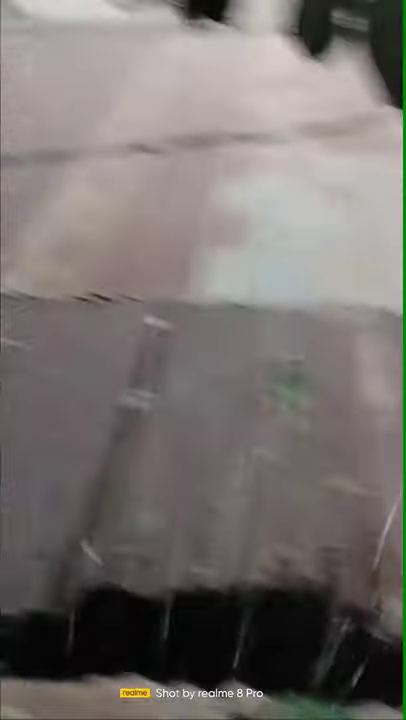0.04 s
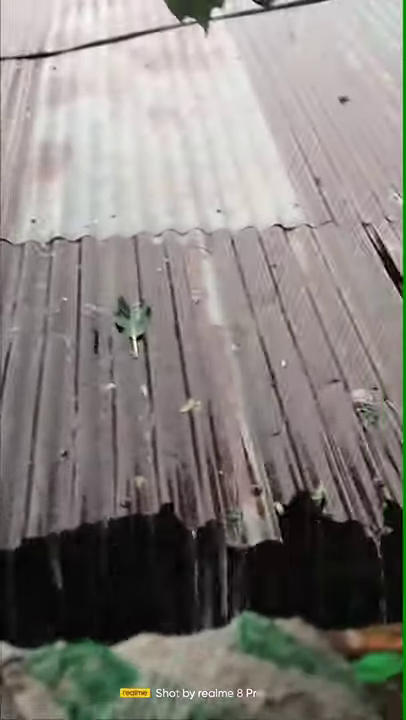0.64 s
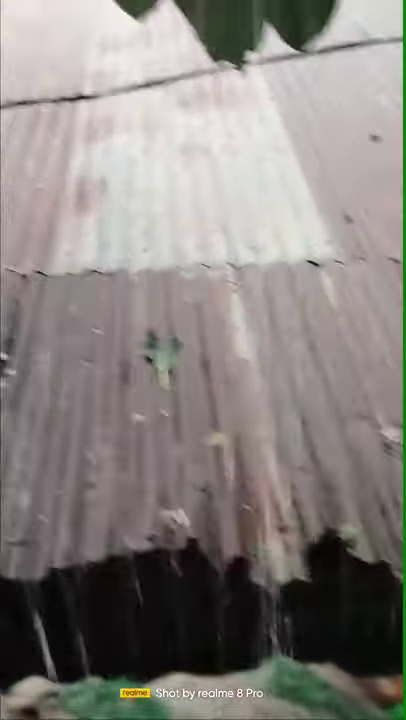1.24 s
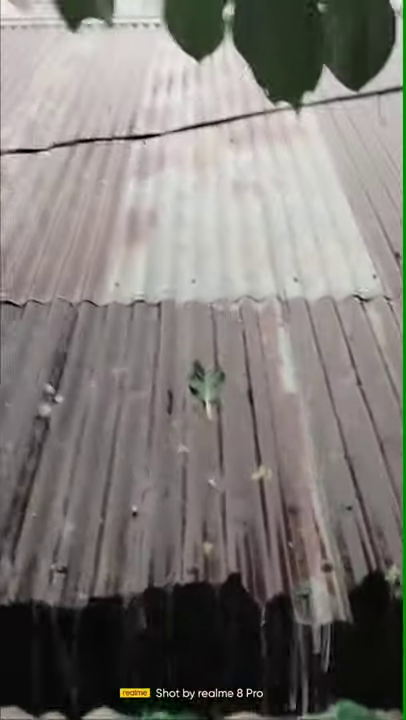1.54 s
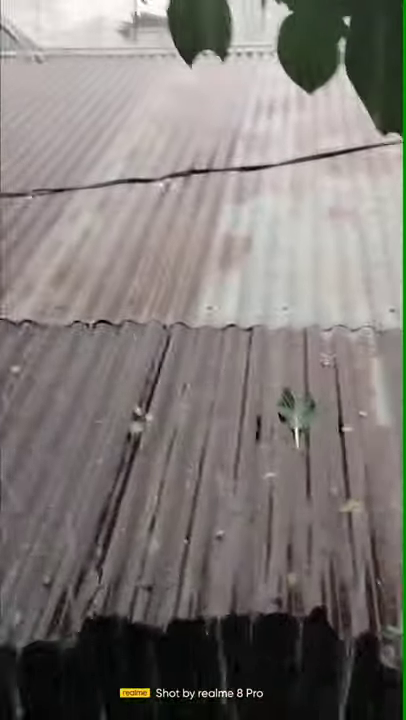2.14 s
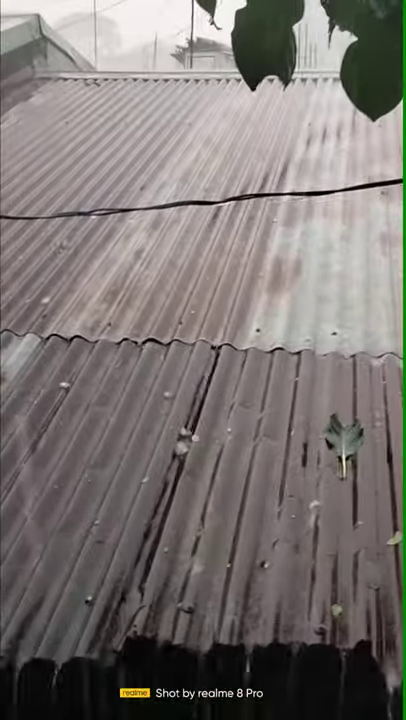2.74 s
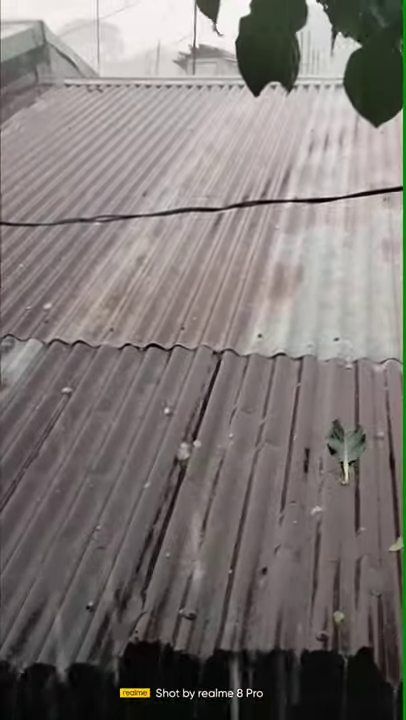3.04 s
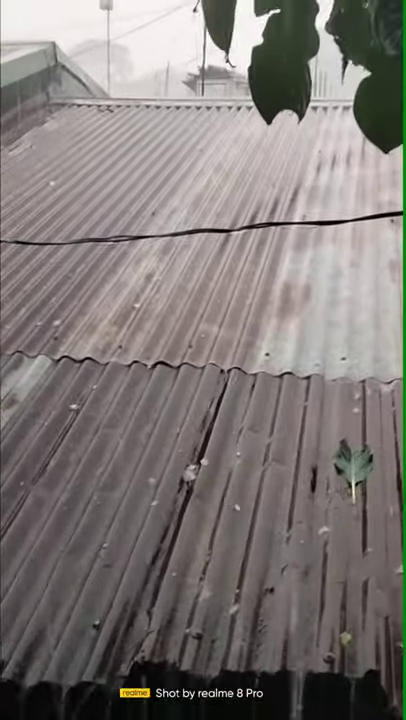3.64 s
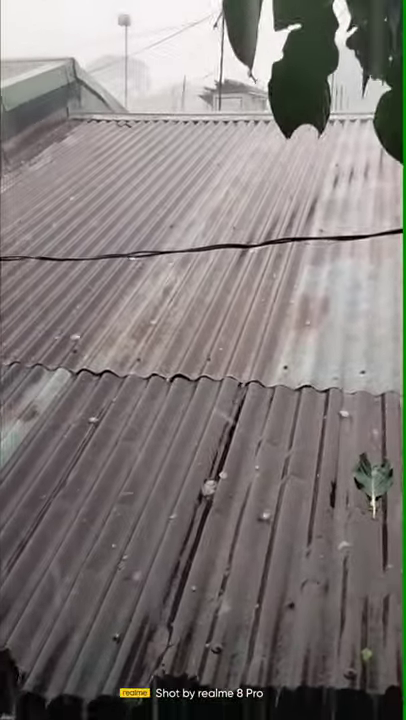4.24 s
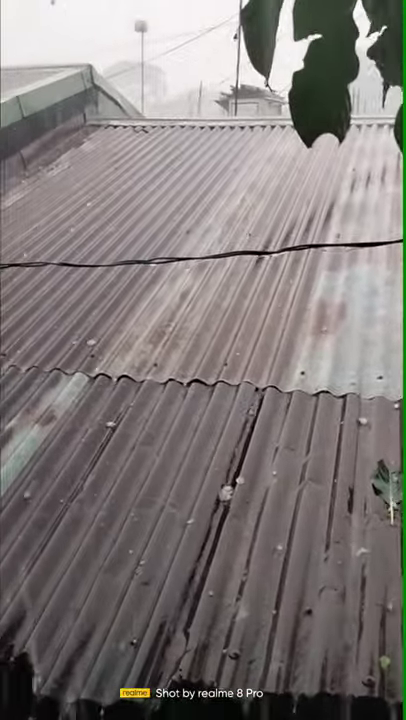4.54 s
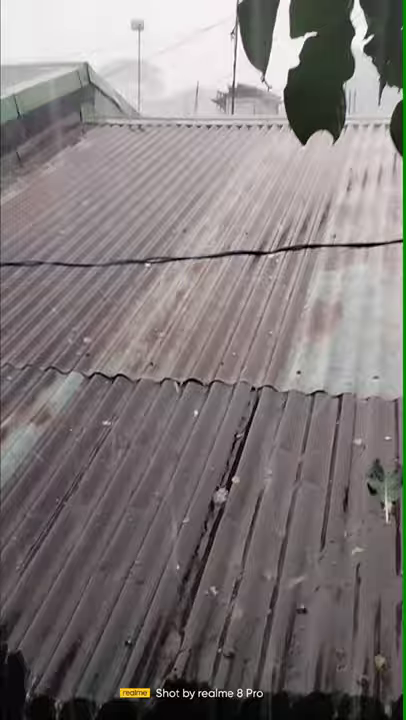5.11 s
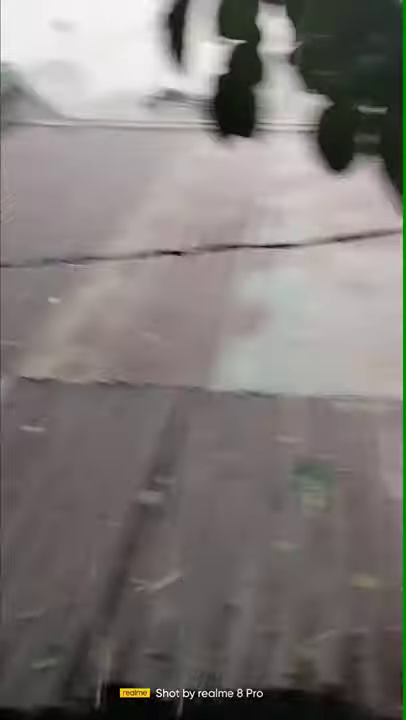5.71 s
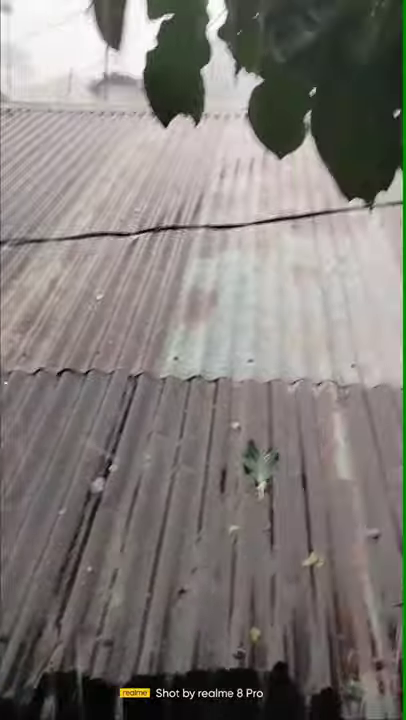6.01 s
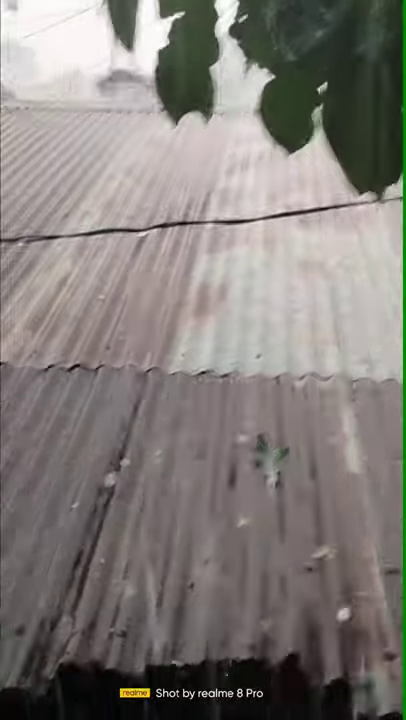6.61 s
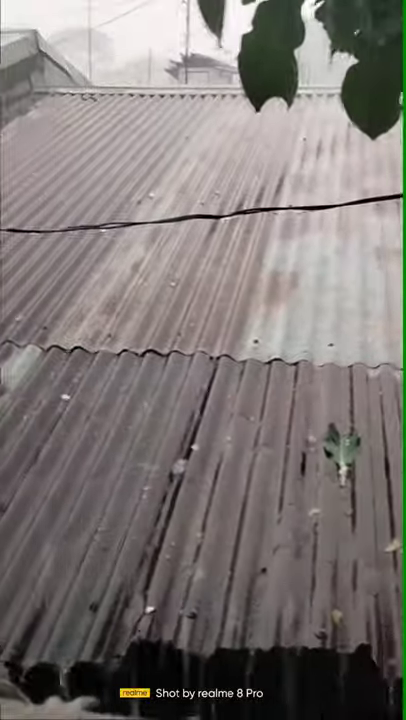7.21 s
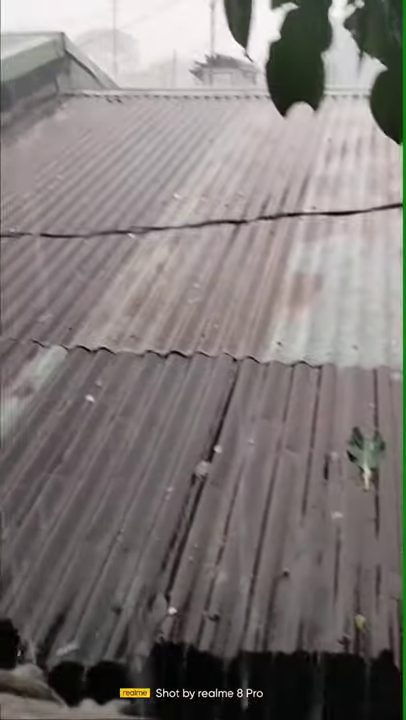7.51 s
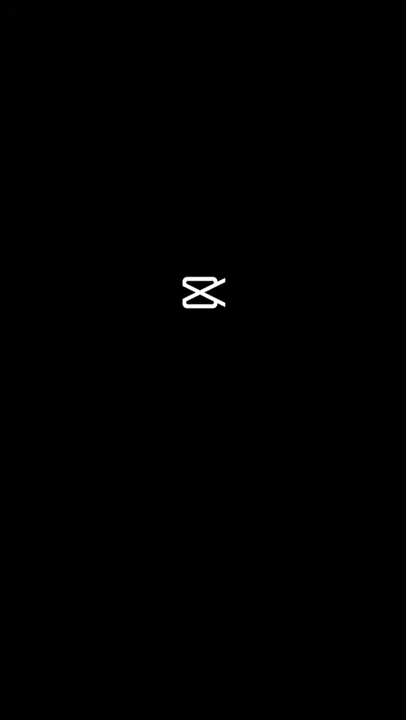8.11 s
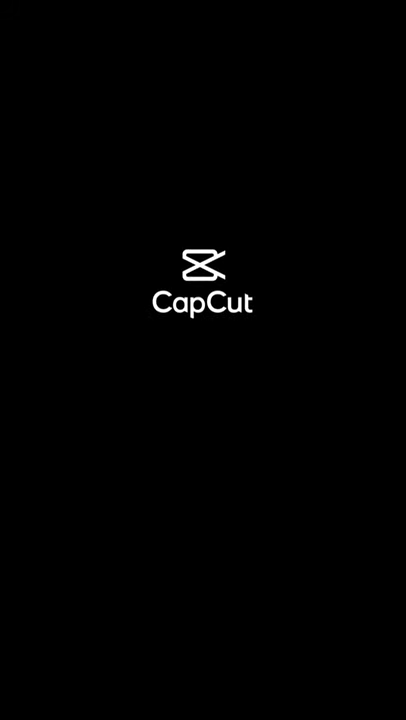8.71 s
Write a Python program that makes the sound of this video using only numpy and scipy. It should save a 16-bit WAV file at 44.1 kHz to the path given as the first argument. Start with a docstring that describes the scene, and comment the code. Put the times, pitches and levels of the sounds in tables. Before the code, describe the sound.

Hailstones hammer and shatter on sheet metal roofing overhead, clanging and thudding through a steady patter of rain.

```python
"""Hail and rain pound corrugated metal roofs, heard from close under the eaves.
From the first instant rain and small stones patter, while larger impacts excite the modes of the metal:
panels thud, ridges knock, sheets further up clang, and near stones shatter with a bright crash.
Near 0.6 and 2.8 s the sound ducks after a loud knock; the lesser clangs swell around 4.7 s.
The heaviest thud and the hardest near crash land at about 6.3 s, and all cuts off just before 8 s."""
import sys
import numpy as np
from scipy import signal
from scipy.fft import rfft, irfft, next_fast_len
from scipy.io import wavfile
from scipy.ndimage import uniform_filter1d, minimum_filter1d, map_coordinates

SR = 44100
rng = np.random.default_rng(int(sys.argv[2]) if len(sys.argv) > 2 else 0)


def waveform_to_disk(signal):
    """Save audio, clipped to [-1, 1], as 16-bit WAV at the path in sys.argv[1]."""
    frames = np.transpose(np.atleast_2d(signal))
    scaled = np.clip(frames, -1, 1) * 32767
    samples = np.round(scaled).astype(np.int16)
    wavfile.write(sys.argv[1], SR, samples)


N = 386316
END_S = 7.956

# A crack or tick as heard through the microphone, which rings near 8 and 15 kHz: f/Hz, relative level/dB
HEARD_CRACK = [(2500, -23.5), (5000, -10.5), (8200, 2.5), (10500, -2.5), (13000, -4), (15200, 1.5)]


def amp(db):
    """Amplitude ratio for a level in decibels."""
    return 10 ** (np.asarray(db) / 20)


def along(points, hz):
    """Spectral envelope: (f/Hz, level/dB) points interpolated on a logarithmic frequency axis."""
    f, db = np.transpose(points)
    return np.interp(np.log(hz + 1), np.log(f + 1), db)


def hump(centre_hz, octaves, hz):
    """Selective excitation, in dB: the spot that is struck favours the modes around one frequency."""
    return -10 * np.log10(1 + (np.log2((hz + 1) / centre_hz[:, None]) / octaves) ** 2)


def ripple(count, hz, spacing_hz):
    """Irregular modal response, in dB: each of count spots has its own uneven comb of modes."""
    knots = rng.standard_normal((count, 400))
    position = np.minimum(hz / spacing_hz, 398)
    k = position.astype(int)
    return knots[:, k] + (position - k) * (knots[:, k + 1] - knots[:, k])


def wobble(rate):
    """Random modulation: a smooth curve through rate knots a second."""
    knots = rng.standard_normal(int(N * rate / SR) + 4)
    return map_coordinates(knots, [np.arange(N) * rate / SR])


def ticks(shape, rate, spread_db):
    """Shot noise: random impulses, rate a second, of log-normal size."""
    hit = rng.random(shape) < rate / SR
    return hit * rng.choice([-1, 1], shape) * amp(spread_db * rng.standard_normal(shape))


def coloured(x, body):
    """Minimum-phase filtering: each row of x takes the gain body(hz), in dB, and is scaled to rms 1."""
    n = x.shape[-1]
    size = 2 * next_fast_len(n // 2 + 1024)
    gain = amp(body(np.fft.rfftfreq(size, 1 / SR)))
    cepstrum = irfft(np.log(gain + 1e-6), size)
    cepstrum[..., 1:size // 2] *= 2  # folding the cepstrum makes the response causal
    cepstrum[..., size // 2 + 1:] = 0
    y = irfft(rfft(x, size) * np.exp(rfft(cepstrum)), size)[..., :n]
    return y / np.sqrt(np.mean(y ** 2, axis=-1, keepdims=True) + 1e-20)


def strikes(times, level_db, body, t60, attack, rate, spread_db):
    """Diffuse decay: each blow sends a dying crowd of reflections through the sheet."""
    t = np.arange(SR // 3) / SR
    reflections = coloured(ticks((len(times), len(t)), rate, spread_db), body)
    envelope = amp(-60 * t / np.reshape(t60, (-1, 1))) * (1 - np.exp(-t / attack))
    out = np.zeros(N + SR)
    for s, blow in zip(times, amp(level_db)[:, None] * reflections * envelope):
        out[max(round(s * SR), 0):][:len(t)] += blow
    return out[:N]


def ringing(times, hz, level_db, t60, attack):
    """Modal superposition: each blow starts a row of damped sinusoids in random phase."""
    t = np.arange(SR // 4) / SR
    out = np.zeros(N + SR)
    for s, f, db in zip(times, hz[:, :, None], level_db[:, :, None]):
        modes = amp(db - 60 * t / t60[:, None]) * np.sin(2 * np.pi * (f * t + rng.random(f.shape)))
        out[max(round(s * SR), 0):][:len(t)] += modes.sum(0) * (1 - np.exp(-t / attack))
    return out[:N]


def level_dips(t, stretch):
    """Amplitude modulation, in dB: set dips; near 0.6 and 2.8 s the sound ducks after a loud knock."""
    # Brief dips in level: t/s, relative level/dB, half-width before stretching/s
    dips = [(0.62, -3.5, 0.048), (0.783, -1.5, 0.045), (1.394, -1, 0.057), (2.84, -2, 0.023),
            (4.345, -2.5, 0.02), (5.326, -4.5, 0.018), (5.516, -3.5, 0.015), (6.255, -3, 0.014),
            (6.35, -3, 0.025), (6.945, -3, 0.024), (7.439, -0.5, 0.02)]
    return sum(db * np.exp(-((t - s) / (half * stretch)) ** 2) for s, db, half in dips)


def shower(count, db, range_db, far):
    """Jittered arrivals: times and levels of lesser stones, which follow the strength of the fall."""
    # Strength of the fall: t/s, relative level close by/dB, relative level further up/dB
    fall = [(0, 1.5, -4), (.5, 5, 3.5), (.75, 2, 3.5), (1.3, -0.5, 1), (1.8, 3.5, -2.5), (2.3, 0.5, 1),
            (2.8, 2, 1.5), (3.3, 0, 4.5), (3.8, -2, -0.5), (4.25, 2.5, -1), (4.7, 1.5, 8), (5.3, 1, -4.5),
            (5.7, 2.5, 1.5), (6.2, -1.5, 1), (6.6, 3.5, 1), (7.1, 1.5, -1.5), (7.6, 1, 0.5),
            (7.95, 1.5, 3.5)]
    at, near_db, far_db = np.transpose(fall)
    slip, size = rng.random((count, 2)).T - .5
    s = (np.arange(count) + .5 + 1.1 * slip) * END_S / count
    fall_db = np.interp(s, at, far_db if far else near_db)
    dip_db = 1.7 * level_dips(s + 0.019, stretch=1.5)  # these stones soften just ahead of each dip
    return s, db + range_db * size + fall_db + dip_db


def pitched_shower(count, db, range_db, far, low_hz, high_hz):
    """Pitch depends on the spot struck: lesser stones as rows of t/s, level/dB, f/Hz."""
    s, level_db = shower(count, db, range_db, far)
    hz = low_hz * (high_hz / low_hz) ** rng.random(count)
    return np.column_stack([s, level_db, hz])


def downpour():
    """Filtered shot noise: small stones patter on every roof around, and rain splashes on wet metal."""
    # Spectrum of small stones on the roofs: f/Hz, relative level/dB
    patter_spectrum = [(25, -48.5), (55, -31.5), (110, -10), (148, -7.5), (200, -16), (305, -5), (460, -9),
                       (620, -3.5), (1000, 0), (1550, -1.5), (2200, -6.5), (2900, -11.5), (4300, -16),
                       (6500, -35)]
    # Splash as heard through the microphone, which rings near 8 and 15 kHz: f/Hz, relative level/dB
    heard_splash = [(2500, -32), (4500, -6), (6200, -12), (7300, -5.5), (8150, 1.5), (9200, -6),
                    (10500, -14), (12000, -17.5), (15200, -8)]
    flurry_db = .5 * wobble(10)
    patter = coloured(ticks(N, rate=2200, spread_db=2.5), lambda hz: along(patter_spectrum, hz))
    splash = coloured(ticks(N, rate=6000, spread_db=2.0), lambda hz: along(heard_splash, hz))
    patter *= amp(-17.5 + flurry_db + 1.1 * wobble(40))
    splash *= amp(-27.0 + flurry_db + 0.87 * wobble(43))
    return patter + splash


def drops():
    """Brief impacts have broad spectra: close drops and ice chips tick on the wet edge of the roof."""
    when, size = rng.random((int(N / SR * 16), 2)).T
    return strikes(when * N / SR, -29 + 11 * size ** 2, lambda hz: along(HEARD_CRACK, hz),
                   t60=0.013, attack=.0002, rate=9000, spread_db=0.5)


def heavy_stones():
    """Flexural vibration: a whole panel booms in its low modes, a little differently at every spot."""
    # The heaviest stones: t/s, relative level/dB, centre of the boom f/Hz
    thuds = [(0.09, -24, 260), (0.156, -27, 240), (0.212, -24.5, 300), (0.262, -27, 130), (0.363, -23, 180),
             (0.816, -26, 150), (2.26, -25.5, 180), (2.756, -24, 258), (3.247, -25.5, 155),
             (3.523, -27.5, 280), (3.736, -21, 190), (3.889, -23.5, 239.4), (4.046, -30, 290),
             (4.496, -29, 170), (5.184, -26, 280), (5.454, -33, 110), (5.922, -26, 170),
             (6.275, -20.5, 180), (6.467, -26.5, 149.6), (6.513, -26.5, 230), (7.569, -25.5, 140),
             (7.884, -28.5, 290)]
    # Modes of a whole panel: f/Hz, relative level/dB, t60/s
    panel_modes = [(75, -20, .2), (110, -5, 0.22), (149.5, -2, 0.21), (211, -3.5, 0.098), (292, -1, .18),
                   (348.5, -4.5, 0.24), (393, -0.5, 0.26)]
    lesser = pitched_shower(count=32, db=-29.5, range_db=5, far=False, low_hz=215, high_hz=305)
    s, db, centre_hz = np.vstack([thuds, lesser]).T
    hz, mode_db, t60 = np.transpose(panel_modes)
    detune = 1 + 0.038 * rng.standard_normal((len(s), len(hz)))
    level_db = db[:, None] + mode_db + hump(centre_hz, 0.4, hz) + 5.5
    return ringing(s, hz * detune, level_db, t60, attack=0.0016)


def ridge_knocks():
    """Damped inharmonic modes: a stone on a corrugation gives a short hollow note."""
    # The clearest knocks: t/s, relative level/dB, pitch f/Hz
    notes = [(0.1, -10, 1020), (0.241, -11.5, 1020), (0.399, -9, 1020), (0.584, -5, 1044),
             (0.7, -11.5, 926), (0.717, -11, 1255), (0.954, -6, 845), (1.146, -10, 980), (1.348, -12, 1060),
             (2.151, -10, 1350), (2.251, -10.5, 1515), (2.757, -9.5, 660), (2.764, -9, 947),
             (3.266, -14, 1160), (3.385, -8, 1120), (3.589, -10, 1600), (3.953, -9.5, 1110),
             (4.1, -8, 1486), (4.578, -10, 1030), (4.606, -8.5, 1580), (4.733, -8, 820), (5.274, -9, 1034),
             (5.76, -10, 786), (5.909, -6.5, 1100), (5.942, -7, 1360), (6.424, -10, 830),
             (6.432, -10.5, 1540), (7.219, -8.5, 1460), (7.349, -7.5, 1310), (7.577, -8, 1310)]
    # Modes of a corrugation: ratio to the pitch, relative level/dB, t60/s
    ridge_modes = [(.63, -14.5, 0.042), (1, -1, 0.055), (1.47, -17.5, .06), (2.1, -17.5, .04)]
    when, size, pitch = rng.random((int(N / SR * 55), 3)).T
    faint = np.column_stack([when * N / SR, -25 + 8 * size, 780 * 2.4 ** pitch])
    lesser = pitched_shower(count=36, db=-13, range_db=7.5, far=True, low_hz=848, high_hz=1686)
    s, db, hz = np.vstack([notes, lesser, faint]).T
    ratio, mode_db, t60 = np.transpose(ridge_modes)
    return ringing(s, np.outer(hz, ratio), db[:, None] + mode_db + 6.0, t60, attack=0.001)


def far_stones():
    """Plate resonance: free spans of sheet further up ring on, each in its own modes."""
    # The loudest clangs: t/s, relative level/dB, centre of the ring f/Hz
    clangs = [(0.034, -7.5, 1150), (0.154, -7.5, 1070), (0.235, -9, 1110), (0.359, -10, 1250),
              (0.523, -5.5, 1240), (0.676, -10, 1080), (0.83, -9.5, 1250), (1.012, -11, 1180),
              (1.151, -8.5, 1200), (1.229, -13.5, 1150), (1.477, -6.5, 1180), (1.54, -9, 1140),
              (1.6, -11, 1330), (1.983, -8.5, 1300), (2.081, -9.5, 1300), (2.241, -8, 1440),
              (2.331, -9, 1440), (2.488, -9, 1290), (2.654, -9.5, 1410), (2.726, -12, 980),
              (3.237, -9, 1130), (3.586, -8.5, 1450), (3.68, -9, 1370), (3.931, -14, 1270),
              (4.075, -7.5, 1370), (4.406, -14, 1410), (4.496, -10.5, 1290), (4.552, -11, 1160),
              (4.741, -8, 1250), (4.911, -11, 1230), (5.051, -11, 1340), (5.136, -12.5, 1370),
              (5.356, -14.5, 1360), (5.559, -9.5, 1070), (5.755, -10, 1050), (5.853, -11.5, 1360),
              (6.125, -7.5, 1330), (6.2, -11, 1170), (6.427, -9, 1340), (6.561, -7.5, 1310),
              (6.729, -9.5, 1270), (6.834, -9, 1410), (7.036, -12, 1220), (7.138, -10, 1340),
              (7.295, -11, 1430), (7.475, -10, 1190), (7.525, -10.5, 1190), (7.567, -12.5, 1190),
              (7.691, -8, 1330), (7.738, -11.5, 1040)]
    # Spectrum of a ringing span: f/Hz, relative level/dB
    clang_spectrum = [(200, -27), (460, -14), (590, -3), (720, -6.5), (980, 1), (1250, -4.5), (1550, 0.5),
                      (1850, -6.5), (2250, -5), (2900, -21.5), (6000, -26.5)]
    lesser = pitched_shower(count=84, db=-15.5, range_db=3.5, far=True, low_hz=1080, high_hz=1480)
    s, db, centre_hz = np.vstack([clangs, lesser]).T
    span = lambda hz: (along(clang_spectrum, hz) + hump(centre_hz, 0.69, hz)
                       + 2.8 * ripple(len(s), hz, spacing_hz=69.1))
    return strikes(s, db - 2.7, span, t60=0.44, attack=0.0035, rate=3000, spread_db=1.5)


def near_stones():
    """Brittle fracture: ice cracks and bursts into splinters while the thin sheet under it crashes."""
    # The hardest near stones: t/s, relative ice level/dB, relative sheet level/dB
    shatters = [(0.0, -19, -16.5), (0.112, -20.5, -16), (0.291, -28, -17.5), (0.363, -14.5, -13),
                (0.503, -20, -13), (0.686, -23.5, -21), (0.858, -21, -17), (0.89, -20.5, -19),
                (0.986, -20.5, -21.5), (1.229, -24.5, -19.5), (1.429, -19, -19), (1.481, -20.5, -20.5),
                (1.531, -19, -18), (1.6, -21.5, -19), (1.656, -24.5, -27.5), (1.764, -21, -24.5),
                (1.838, -18.5, -21.5), (1.983, -23.5, -24.5), (2.149, -25.5, -21.5), (2.327, -26, -20),
                (2.49, -23.5, -18.5), (2.618, -22, -20), (2.905, -20.5, -19.5), (3.059, -23, -18),
                (3.125, -20.5, -16), (3.229, -28, -16), (3.426, -24, -19), (3.598, -23, -19.5),
                (3.68, -20, -15.5), (3.74, -15.5, -15.5), (3.893, -16, -14.5), (4.045, -25, -17.5),
                (4.125, -21.5, -20.5), (4.167, -17, -19), (4.274, -20.5, -12.5), (4.392, -19.5, -18),
                (4.538, -21, -15), (4.823, -23, -27), (4.925, -25, -17.5), (5.033, -19.5, -19.5),
                (5.18, -20, -16.5), (5.392, -24, -34), (5.464, -21.5, -24.5), (5.747, -21.5, -26.5),
                (5.913, -19, -20), (6.044, -20, -14), (6.176, -18, -20.5), (6.274, -17.5, -11.5),
                (6.701, -23.5, -14.5), (6.82, -20.5, -19), (6.872, -20.5, -20), (7.018, -30, -16),
                (7.166, -20.5, -14.5), (7.244, -20, -21.5), (7.467, -18, -16.5), (7.88, -17.5, -17.5)]
    # Ice as heard through the microphone, which rings near 8 and 15 kHz: f/Hz, relative level/dB
    heard_ice = [(2500, -27), (4500, -3.5), (6200, -12), (7300, -4.5), (8150, 4.5), (9200, -2.5),
                 (10500, -15), (12000, -21.5), (13500, -7.5), (15200, -14.5)]
    # Spectrum of the crashing sheet: f/Hz, relative level/dB
    crash_spectrum = [(300, -23), (1000, -1), (2100, 3.5), (2900, -0.5), (4300, -3), (5400, -13),
                      (8000, -21.5), (14000, -34.5)]
    lesser_s, lesser_db = shower(count=112, db=-25.5, range_db=4, far=False)
    lesser = np.column_stack([lesser_s, lesser_db, lesser_db + 3.0])
    s, ice_db, sheet_db = np.vstack([shatters, lesser]).T
    burst = lambda hz: along(HEARD_CRACK, hz)
    ice = lambda hz: along(heard_ice, hz) + 2 * ripple(len(s), hz, spacing_hz=205.2)
    sheet = lambda hz: along(crash_spectrum, hz) + 2.6 * ripple(len(s), hz, spacing_hz=128.6)
    crack = strikes(s, ice_db + 0.8, burst, t60=0.18, attack=.001, rate=4600, spread_db=3)
    splinters = strikes(s, ice_db + 0.69, ice, t60=0.32, attack=.001, rate=9000, spread_db=2)
    crash = strikes(s, sheet_db + 2.0, sheet, t60=0.35, attack=.0015, rate=5000, spread_db=0.5)
    return crack + splinters + crash


def scene():
    """Superposition: stones and rain add together; the level dips now and then, and stops abruptly."""
    t = np.arange(N) / SR
    roof = near_stones() + far_stones() + ridge_knocks() + heavy_stones() + drops() + downpour()
    return (roof * amp(level_dips(t, stretch=1)) * (t < END_S))[None]


def record(dry):
    """Band and peak limiting: the microphone loses deep bass, peaks are ducked, the top treble is cut."""
    bass_hz, top_hz, ceiling = 42, 15570, .98
    thin = signal.sosfilt(signal.butter(2, bass_hz, "highpass", fs=SR, output="sos"), dry)
    needed_gain = np.minimum(1, ceiling / (np.abs(thin) + 1e-9))
    held_gain = minimum_filter1d(needed_gain, size=201, origin=60)
    limited = thin * uniform_filter1d(held_gain, size=61)
    lowpass = signal.firwin(601, top_hz, fs=SR, window="blackman")
    return signal.fftconvolve(limited, lowpass[None], mode="same", axes=1)


dry = scene()
out = record(dry)
waveform_to_disk(out)
```